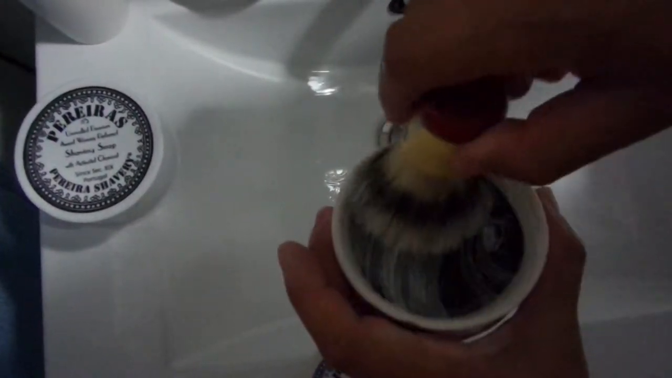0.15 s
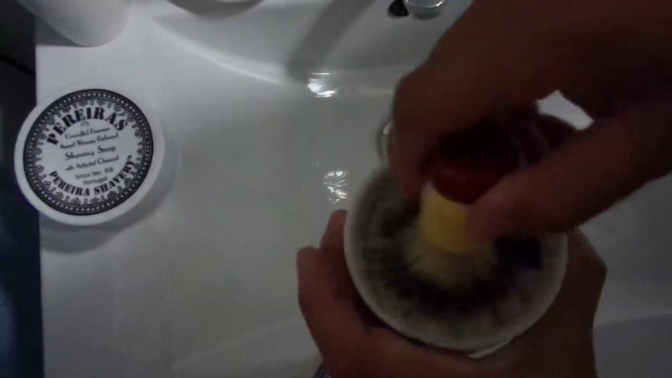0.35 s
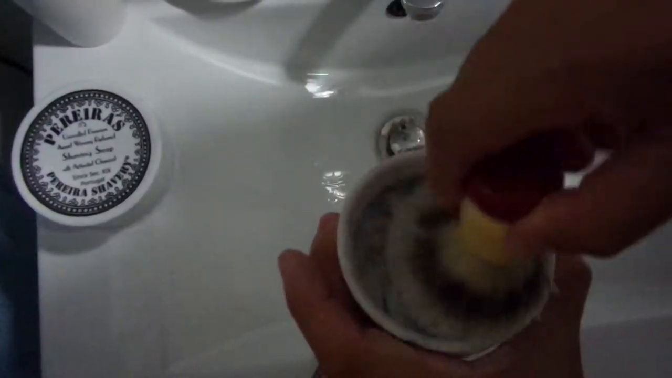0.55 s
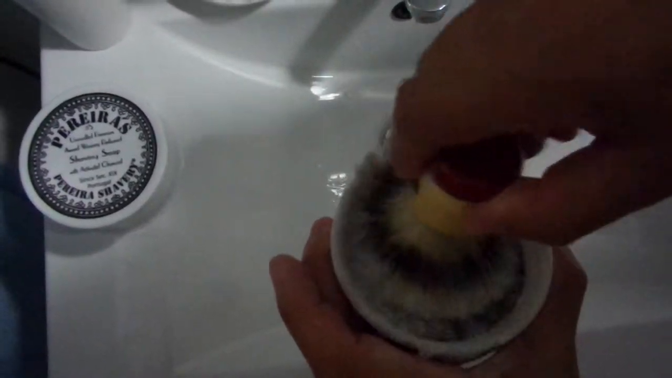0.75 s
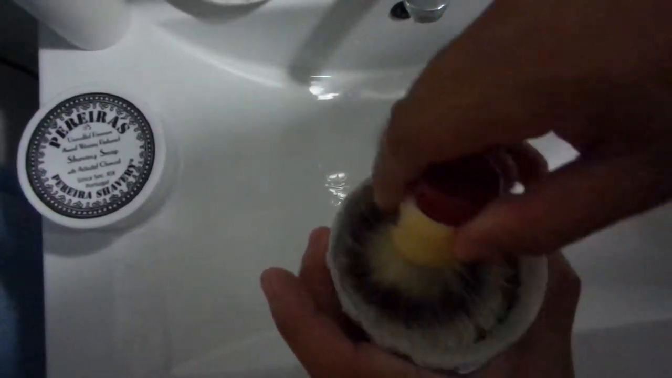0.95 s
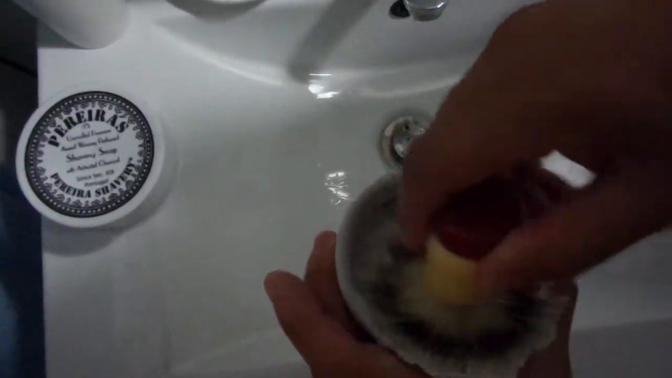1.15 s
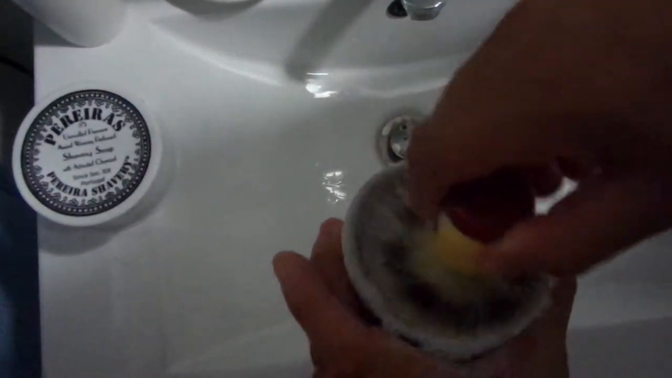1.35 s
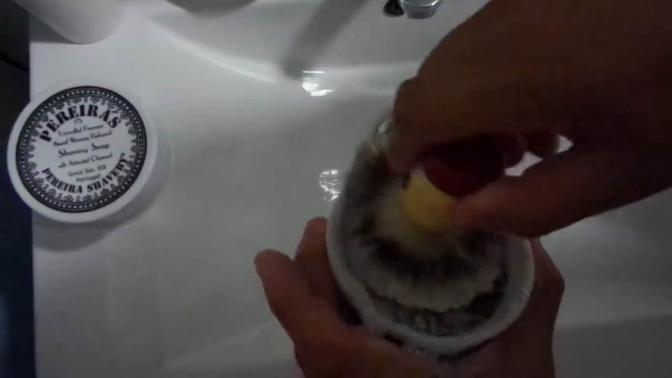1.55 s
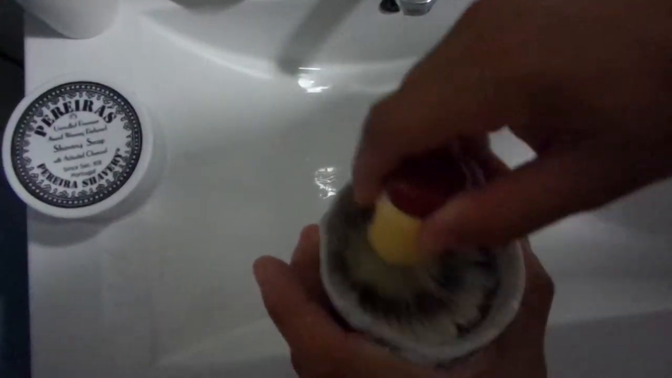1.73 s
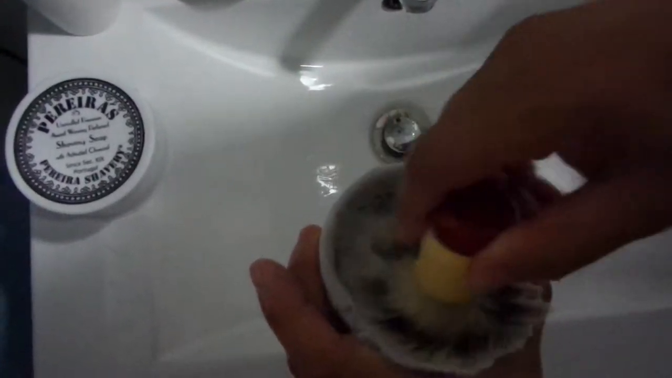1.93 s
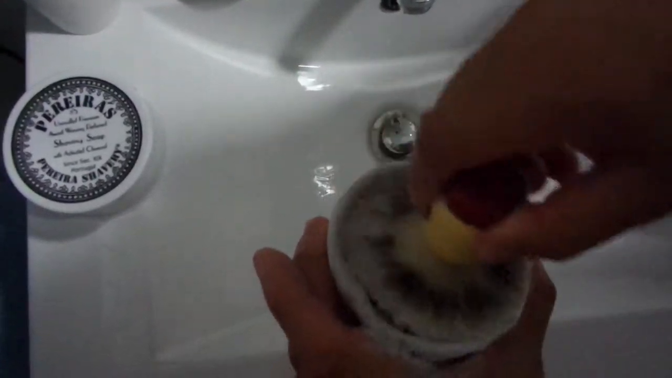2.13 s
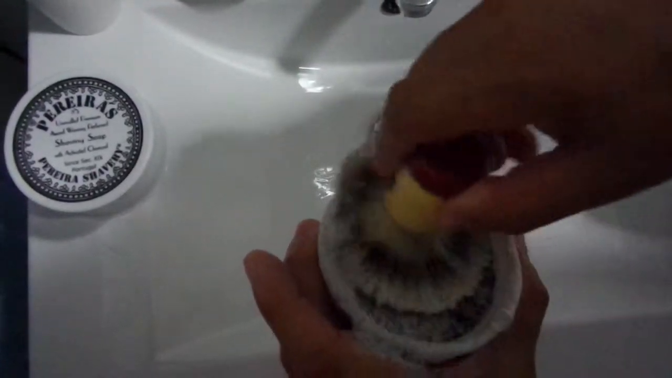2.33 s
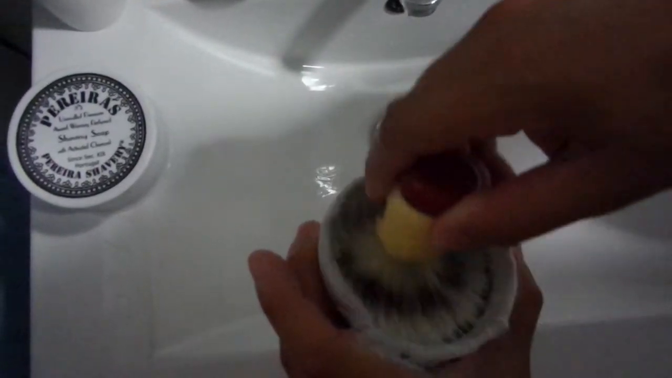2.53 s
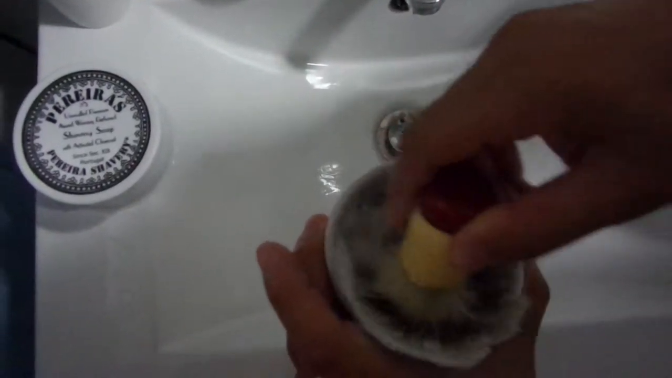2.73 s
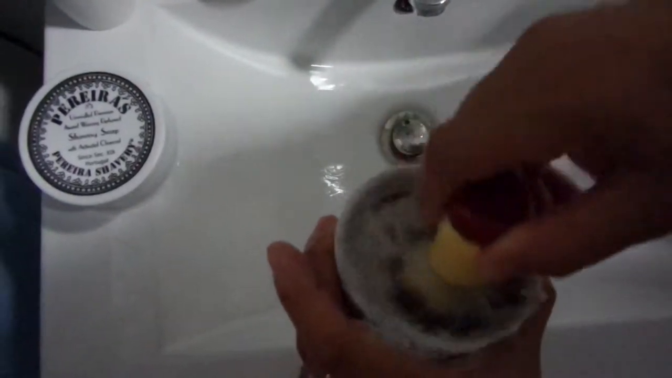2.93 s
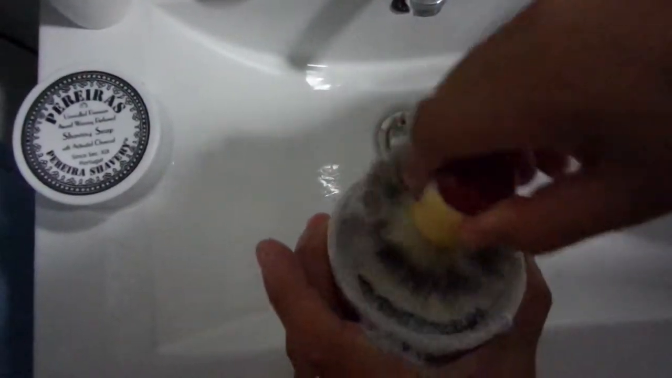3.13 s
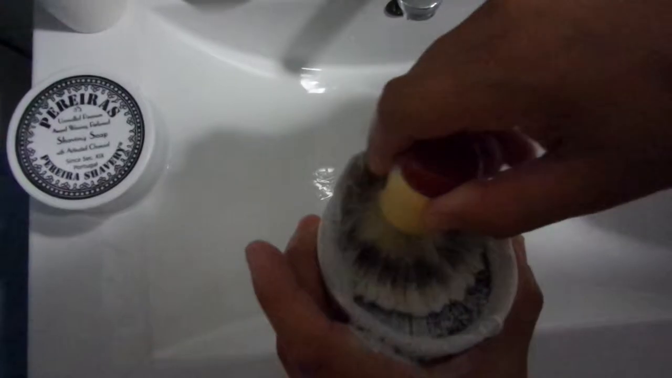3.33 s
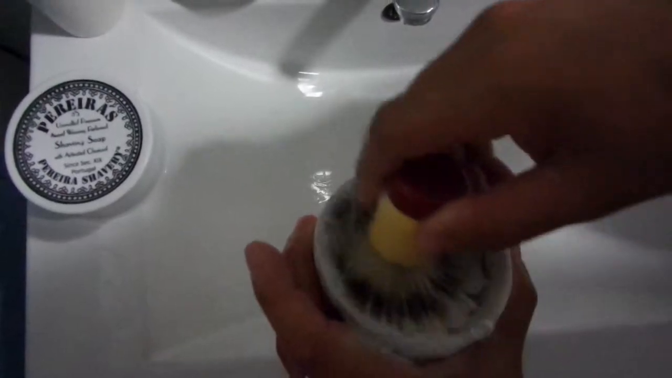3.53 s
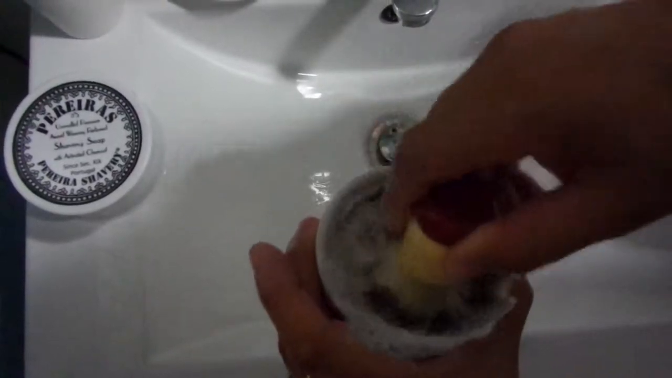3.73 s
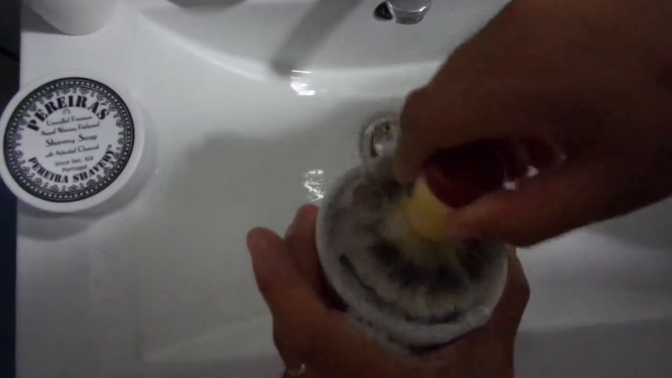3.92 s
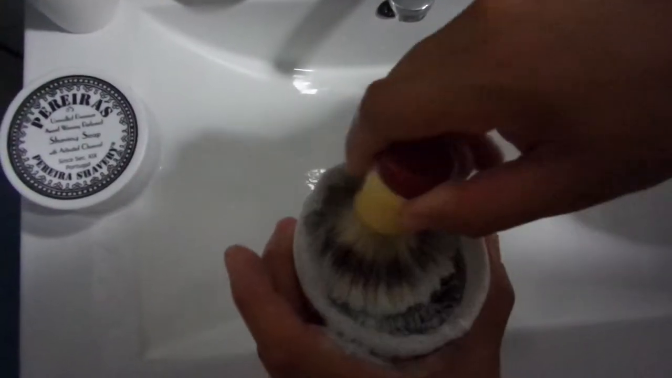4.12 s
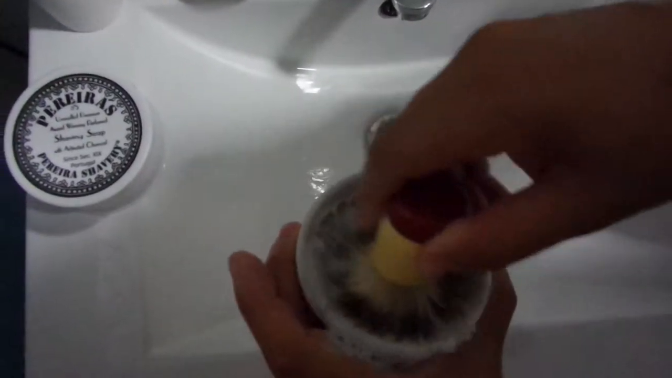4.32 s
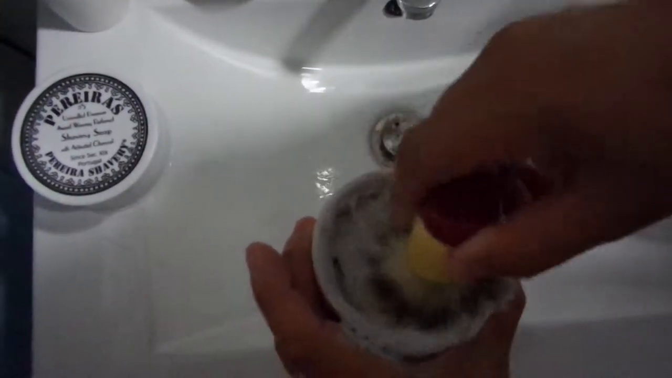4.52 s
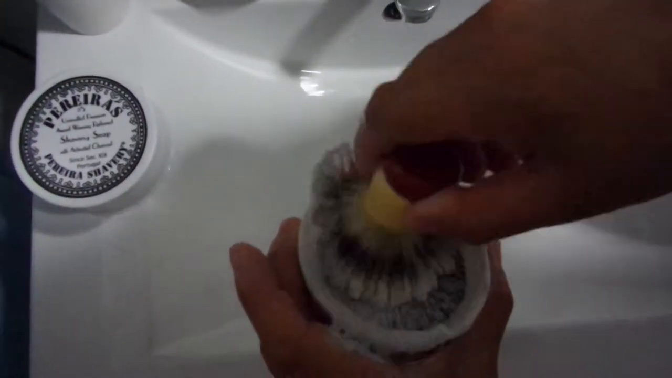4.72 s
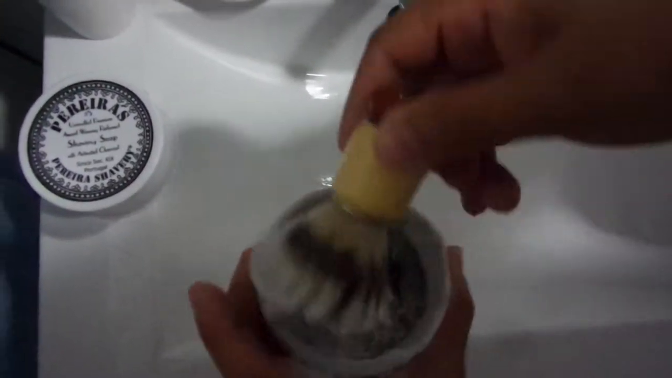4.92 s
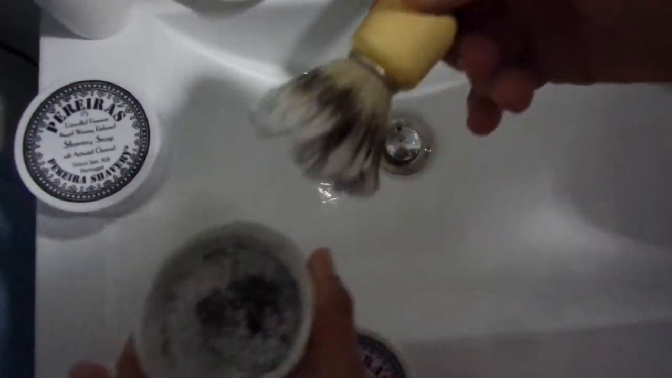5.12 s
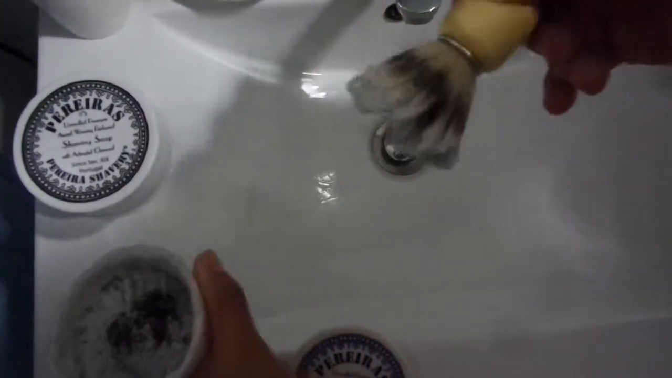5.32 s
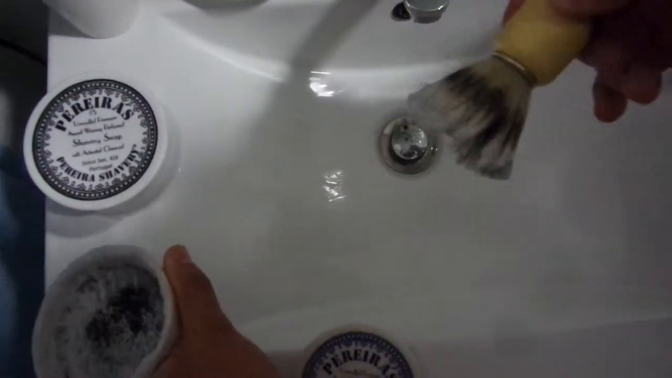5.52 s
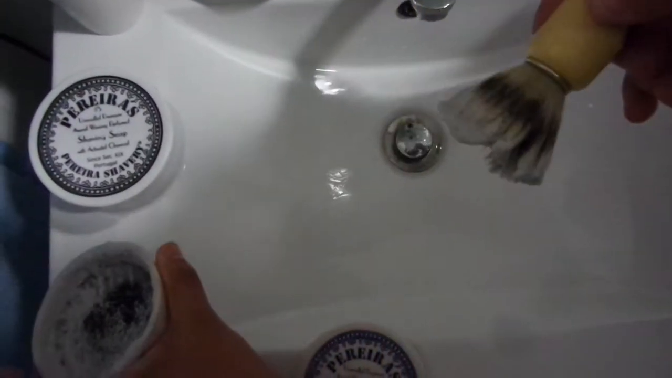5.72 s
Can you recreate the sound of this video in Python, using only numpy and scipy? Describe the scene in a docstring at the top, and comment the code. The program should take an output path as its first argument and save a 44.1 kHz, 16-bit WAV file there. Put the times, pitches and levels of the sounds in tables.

```python
"""Wet bristles swirl on a puck of soap in a hand-held tub over a bathroom sink, catching and flicking free.
Clumped clicks ring through tub resonances; finer, brighter clicks make the lather fizz, and both follow the strokes.
The brush lifts off, fingers slide on the tub, and at last a hard knock on the basin rattles as decaying modes.
The right microphone hears it clearly and the left muffled, over hiss, rumble, a wavering hum and a thin whine."""
import sys
import numpy as np
from scipy import signal
from scipy.fft import rfft, irfft
from scipy.io import wavfile
from scipy.ndimage import uniform_filter1d

SR = 44100
rng = np.random.default_rng(int(sys.argv[2]) if len(sys.argv) > 2 else 0)


def to_wav(sig):
    """Store sig (one row per channel, or 1-D mono) as 16-bit WAV at the path in sys.argv[1].

    Samples outside -1..1 are clipped; the rate is SR.
    """
    pcm = np.clip(np.atleast_2d(sig), -1, 1) * 32767
    pcm = np.round(pcm).astype(np.int16)
    wavfile.write(sys.argv[1], SR, pcm.T)  # frames by channels


N = 258426
T = np.arange(N) / SR

# Levels in the tables are relative; the functions trim and mix them.
# room and microphones at rest, left and right: f/Hz, level/dB
FLOOR_LEFT = [(25, -20), (55, -17), (90, -3), (140, 4), (250, -2.5), (450, -9), (750, -25), (1200, -21.5),
              (2000, -17), (3200, -25), (8000, -28.5), (12000, -25), (15000, -19), (15600, -12)]
FLOOR_RIGHT = [(25, -25), (55, -44), (90, -4), (135, 5.5), (220, -6.5), (400, -10.5), (650, -15),
               (2200, -13.5), (3200, -20), (5400, -21), (6800, -11), (9200, -9.5), (10500, -22.5),
               (14500, -21.5), (15600, -14)]
# a low hum that comes and goes: middle t/s, length t/s, level/dB
HUM_SWELLS = [(.75, 0.24, -66), (1.15, 0.23, -65), (1.9, 0.26, -67), (2.33, 0.47, -64.5), (2.82, 0.67, -60),
              (3.15, 0.33, -63), (4.8, 0.27, -71), (5.22, 0.33, -65)]
# lasting thin whine: f/Hz, level/dB
WHINE_TONES = [(6165, -71.5), (7675, -78.5), (7698, -72), (15350, -69)]
# faint tones that come and go together: f/Hz, level/dB
WHIRR_TONES = [(5879, -82), (7052, -77), (8227, -71)]
# when those tones sound: from t/s, to t/s
WHIRR_SPANS = [(2.21, 3.3), (4.31, 5.2), (5.0, 10)]
# decay of the room: f/Hz, t60/s
ROOM_T60 = [(100, 1), (1000, 0.15), (4000, 0.1), (12000, 0.26)]
# reflections from the basin: delay t/s, strength (gain)
BASIN_REFLECTIONS = [(.0013, -0.022), (.0029, 0.083), (.0041, -0.092), (.0058, 0.097), (.0083, -0.043)]
# the muffled left side: f/Hz, level/dB
LEFT_MIC = [(100, -9), (400, -22), (900, -23.5), (2000, -40.5), (5000, -22.5), (10000, -50), (16000, -5)]
# colour of the palm's rub: f/Hz, level/dB
GRIP_COLOUR = [(100, -33), (250, -1), (330, -8.5), (440, -1), (600, -18), (1200, -26), (4000, -70)]
# the palm shifting on the tub: middle t/s, length t/s, level/dB
RUBS = [(1.13, 0.24, -63.5), (2.1, 0.31, -58), (2.4, .25, -57), (3.3, 0.92, -65), (3.75, 0.27, -58),
        (4.07, 0.13, -62.5), (5.35, 0.36, -64)]
# colour of the sliding fingers: f/Hz, level/dB
SLIDE_COLOUR = [(600, -14), (1300, -6.5), (2300, -1.5), (3200, -5.5), (3800, 3), (4450, 2), (5000, -14),
                (9000, -7), (16000, -44)]
# fingers sliding as the tub is put aside: middle t/s, length t/s, level/dB
SLIDES = [(5.0, 0.71, -61.5), (5.23, 0.23, -55), (5.37, 0.18, -52)]
# modes of the tub when nudged: f/Hz, level/dB, t60/s
NUDGE_MODES = [(247, 3.5, 0.052), (538, -8, 0.12), (853, -8, 0.17), (1030, -9, 0.13), (1840, -2, .09),
               (2140, -2, 0.062)]
# ticks of handling and bursting foam: t/s, level/dB, centre f/Hz, width/octaves, t60/s, left minus right level/dB
TICKS = [(.157, -44, 1700, .7, 0.021, 15), (.656, -50, 1700, .7, 0.028, 17),
         (1.439, -46, 2680, 1, 0.033, 15), (1.799, -45, 1900, .8, 0.043, 12),
         (5.181, -41.5, 6500, 0.4, .02, -21), (5.3045, -24.5, 11500, 0.67, 0.023, -32),
         (5.305, -34, 3620, .08, 0.041, -34), (5.308, -30, 2300, 1, 0.017, -32),
         (5.326, -48, 2180, 0.57, 0.031, 12), (5.4255, -29.5, 1850, 1.0, 0.005, -28),
         (5.69, -47, 6240, 0.19, 0.013, -11), (5.7325, -39, 6400, 0.26, 0.0089, -15),
         (5.7565, -43, 6900, 0.27, 0.014, -15)]
# dull bumps of hands and tub: t/s, level/dB, centre f/Hz, width/octaves, t60/s, left minus right level/dB
BUMPS = [(.275, -45.5, 334, 0.54, 0.11, -22), (3.31, -46, 126, 0.4, .2, -10),
         (3.535, -43.5, 327, 0.25, 0.23, -18), (5.149, -36.5, 150, 0.92, 0.23, -23),
         (5.424, -44, 396, 0.38, 0.11, -21)]
# the knock and its rebounds: t/s, level/dB
KNOCKS = [(5.8183, -2.5), (5.8385, -10.5), (5.8492, -11), (5.856, -18)]
# ringing modes of the knock: f/Hz, level/dB, t60/s
KNOCK_MODES = [(127, -16.5, 0.65), (229, -20, 0.12), (290, -22, 0.17), (331, -20.5, 0.086),
               (785, -45, 0.066), (860, -29, 0.087), (1120, -28, 0.13), (1230, -7.5, 0.05),
               (1694, -20, 0.14), (1788, -23, 0.14), (2150, -13, 0.058), (2270, -34, 0.04),
               (3670, -23, .05), (4240, -29, 0.037)]
# colour of the knock's thud: f/Hz, level/dB
KNOCK_COLOUR = [(60, -19), (130, -2), (330, -5.5), (550, -13), (1150, 2.5), (1800, 0), (2300, -6),
                (2950, -14.5), (4200, -21.5), (5200, -31), (6000, -29), (9000, -36), (16000, -71)]
# colour of bristles on soap: f/Hz, level/dB
BRISTLE_COLOUR = [(200, -22.5), (400, -13), (680, -14.5), (850, -4.5), (1020, -13.5), (1220, -3),
                  (1900, -5.5), (2550, -4), (3200, -10), (4100, -9.5), (5200, -14.5), (6800, -10),
                  (10500, -23), (16000, -20.5)]
# colour of the lather's fizz: f/Hz, level/dB
LATHER_COLOUR = [(1500, -38), (3000, -6), (4100, 4.5), (5200, -7.5), (6800, 3.5), (9200, 0.5),
                 (10500, -13.5), (16000, -26.5)]
# resonances of tub and soap under the brush: f/Hz, bandwidth f/Hz, level/dB
TUB_RESONANCES = [(1215, 87, -3), (1587, 116, 1), (2264, 125, 8)]
# light contact between strokes: t/s, bristle level/dB, lather level/dB
CONTACT = [(0, -55, -43.5), (.07, -61, -55.5), (.24, -68.5, -55.5), (0.451, -63.5, -52),
           (.58, -66.5, -54.5), (.88, -63, -55), (1.3, -60, -51.5), (1.6, -63.5, -54), (2.0, -54, -49),
           (2.5, -63, -54), (2.8, -58.5, -51.5), (3.349, -54.5, -50.5), (3.901, -58.5, -55),
           (4.38, -65.5, -52.5), (4.48, -66, -56), (4.78, -65.5, -54)]
# pushes of the brush round the puck: middle t/s, length t/s, level/dB
STROKES = [(.125, 0.086, -53.5), (.39, 0.25, -59.5), (.49, 0.04, -58), (.7, 0.098, -54),
           (.78, 0.033, -56.5), (.98, 0.1, -54.5), (1.06, .07, -54.5), (1.14, 0.057, -51),
           (1.28, 0.12, -56), (1.38, 0.064, -48.5), (1.46, 0.098, -56), (1.54, 0.051, -52),
           (1.68, 0.36, -58.5), (1.9, 0.095, -51), (2.07, 0.064, -52), (2.18, 0.046, -54.5),
           (2.31, 0.12, -52), (2.42, 0.19, -52.5), (2.58, 0.073, -47.5), (2.74, 0.28, -52.5),
           (2.84, 0.083, -51), (2.96, 0.12, -52), (3.085, 0.078, -48.5), (3.19, 0.11, -55),
           (3.3, .12, -53.5), (3.42, .11, -52), (3.6, 0.15, -55), (3.69, 0.066, -49.5),
           (3.85, 0.071, -50.5), (3.97, 0.08, -50.5), (4.08, 0.14, -55), (4.15, 0.03, -53),
           (4.28, 0.16, -52.5), (4.4, 0.11, -51.5), (4.54, 0.091, -53), (4.63, 0.12, -54),
           (4.7, 0.036, -49), (4.86, 0.14, -48)]
# tufts of bristles snapping free: t/s, level/dB, ring f/Hz, treble level/dB
SNAPS = [(0.101, -28.5, 2480, -30), (0.133, -50, 2470, -8), (0.1729, -33, 2470, -7),
         (0.3274, -34, 2280, -1), (.374, -36.5, 2140, -13), (0.6775, -34, 7160, 0),
         (0.8958, -35.5, 7650, 7), (0.9736, -38.5, 1680, -22), (1.3112, -38, 2480, -11),
         (1.5033, -36, 2430, -33), (1.668, -37.5, 4170, -6), (1.7861, -32, 7350, -4),
         (1.7958, -33, 2260, 1.5), (2.062, -33.5, 2440, -9), (2.0927, -37, 2380, 2),
         (2.157, -39, 2520, -25), (2.2235, -35, 2370, -2), (2.3297, -30.5, 2300, -2),
         (2.4436, -38, 2530, -9), (2.585, -30, 8560, -4), (2.7291, -30.5, 1710, -36),
         (2.8444, -44, 2170, 6), (3.0775, -28.5, 2260, -12), (3.1555, -41, 1590, -14),
         (3.185, -35, 2340, -3), (3.338, -31.5, 2260, -6), (3.3846, -42, 2400, -20), (3.604, -42, 2330, 9),
         (3.857, -42, 2370, -23), (4.2804, -48, 2370, -5), (4.4162, -38, 2180, 0)]

LATHER_FOLLOWS = 0.37  # dB of fizz for each dB that a stroke adds
LIFT_S, LIFT_DB_PER_S = 4.9, 280  # the brush leaves the soap
EDGE_HZ = 15850  # upper band limit


def amp(db):
    """Decibels to gain."""
    return 10 ** (np.asarray(db) / 20)


def unit(x):
    """Scales to rms 1."""
    return x / np.sqrt(np.mean(x ** 2) + 1e-20)


def read(points, hz):
    """Reads a spectrum table on a log-frequency axis."""
    f, value = np.transpose(points)
    return np.interp(np.log(hz + 1), np.log(f + 1), value)


def add(mix, s, sound):
    """Mixes a sound in at time s, cut at the end of the mix."""
    part = mix[..., round(s * SR):][..., :sound.shape[-1]]
    part += sound[..., :part.shape[-1]]


def convolve(x, response):
    """Filters and keeps the length."""
    return signal.oaconvolve(x, response)[:len(x)]


def impulse(colour, size=2048):
    """The causal, minimum-phase click that has a given spectrum."""
    log_gain = np.log(amp(read(colour, abs(np.fft.fftfreq(size, 1 / SR)))))
    spectrum = np.exp(np.conj(signal.hilbert(log_gain)))
    return np.fft.ifft(spectrum).real[:size // 2]


def noise(colour):
    """Steady noise of rms 1 with a given spectrum."""
    gain = amp(read(colour, np.fft.rfftfreq(N, 1 / SR)))
    return unit(irfft(rfft(rng.standard_normal(N)) * gain, N))


def wander(hz):
    """A random drift of rms 1, with 2 * hz new points a second."""
    points = rng.standard_normal(N // 100)
    return unit(np.interp(T * hz * 2, np.arange(len(points)), points))


def swells(rows, rest_db):
    """Gain over time: a resting level plus a bell of power for each (middle s, length s, dB) row."""
    power = amp(rest_db) ** 2 + np.zeros(N)
    for s, length, db in rows:
        near = slice(max(round((s - length) * SR), 0), round((s + length) * SR))
        power[near] += amp(db) ** 2 * np.exp(-10 * ((T[near] - s) / length) ** 2)
    return np.sqrt(power)


def unsteady_tone(hz, drift_hz, rate_hz):
    """A sine of rms 1 whose pitch wanders by drift_hz rms."""
    return unit(np.sin(2 * np.pi * np.cumsum(hz + drift_hz * wander(rate_hz)) / SR))


def hum(hum_hz=57):
    """A low hum whose pitch and level waver as it swells, stronger on the right."""
    tone = unsteady_tone(hum_hz, drift_hz=2.4, rate_hz=6.3)
    mono = tone * swells(HUM_SWELLS, rest_db=-74) * amp(1.5 * wander(5))
    return mono * amp([[-5], [2]])


def hiss_and_rumble(left_db=-56.0, right_db=-58, split_hz=400, rumble_left_db=-63.5, rumble_right_db=-60.0,
                    waver_db=1.0, settle_db_per_s=0.42):
    """Microphone hiss as shaped noise, its low part split off as an uneven rumble that slowly settles."""
    floor = np.array([amp(left_db) * noise(FLOOR_LEFT), amp(right_db) * noise(FLOOR_RIGHT)])
    low = signal.sosfiltfilt(signal.butter(4, split_hz, fs=SR, output="sos"), floor)
    rumble_left = unit(low[0])
    rumble_right = unit(unit(low[1]) + 0.13 * rumble_left)  # the sides share a little rumble
    rumble = np.array([amp(rumble_left_db) * rumble_left, amp(rumble_right_db) * rumble_right])
    rumble = rumble * amp(waver_db * wander(4) - settle_db_per_s * (T - T.mean()))
    return floor - low + rumble


def whine_and_whirr():
    """A thin lasting whine and faint tones that switch on and off, all slightly unsteady sines."""
    def tones(rows):
        """Sums unsteady sines from rows of (Hz, dB)."""
        return sum(amp(db) * unsteady_tone(hz, drift_hz=9, rate_hz=30) for hz, db in rows)

    spans = sum(1. * (T > start) * (T < end) for start, end in WHIRR_SPANS)
    running = uniform_filter1d(spans, size=600)  # soft switching; overlapping spans add up
    return (tones(WHINE_TONES) + running * tones(WHIRR_TONES)) * amp([[-18], [0]])


def bathroom(x, room_db):
    """Quick reflections from the basin, then sparse echoes decaying by frequency like a small hard room."""
    t = np.arange(SR // 2) / SR
    late = rng.standard_normal(len(t)) * (rng.random(len(t)) < .1) * (t > .004)
    hz, at, bands = signal.stft(late, SR, nperseg=256)
    decay = amp(-60 * at / read(ROOM_T60, hz)[:, None])
    late = signal.istft(bands * decay, SR, nperseg=256)[1][:len(t)]
    response = amp(room_db) * late / np.linalg.norm(late)
    for s, strength in BASIN_REFLECTIONS:
        add(response, s, np.array([strength]))
    return x + convolve(x, response)


def grip(grip_db=-1, slide_db=-1):
    """The hand that holds the tub: friction noise, dull under the palm and hissing under sliding fingers."""
    palm = noise(GRIP_COLOUR) * swells(RUBS, rest_db=-71) * amp(grip_db)
    fingers = noise(SLIDE_COLOUR) * swells(SLIDES, rest_db=-100) * amp(slide_db)
    return palm + fingers


def ringing(modes, t):
    """Decaying sines from rows of (Hz, dB, t60 s)."""
    return sum(amp(db - 60 * t / t60) * np.sin(2 * np.pi * hz * t) for hz, db, t60 in modes)


def nudge(s=1.083, nudge_db=-45):
    """The handle touches the tub, whose modes ring softly."""
    out, t = np.zeros(N), np.arange(SR // 4) / SR
    add(out, s, amp(nudge_db) * ringing(NUDGE_MODES, t))
    return out


def taps(rows, gain_db, scatter):
    """A click and its short dying rattle, band-limited round one pitch, each on its own side."""
    out, t = np.zeros((2, N)), np.arange(SR // 4) / SR
    grid = np.geomspace(20, 20000, 90)
    for s, db, hz, width, t60, side_db in rows:
        bell = -.5 * (np.log2(grid / hz) / width) ** 2
        band_db = np.maximum(20 * np.log10(np.e) * bell, -60)
        drive = scatter * rng.standard_normal(len(t)) * amp(-60 * t / t60)
        drive[0] = 1  # the click itself
        burst = convolve(drive, impulse(np.c_[grid, band_db]))
        sides = amp(np.minimum([[side_db], [-side_db]], 0))  # only the far side is turned down
        add(out, s, sides * amp(db + gain_db) * burst / abs(burst).max())
    return out


def knock(knock_db=-9, crack_hz=2250, crack_s=0.001, crack_db=-1, ring_db=-1, scatter=0.08,
          scatter_s=0.031, echo_s=0.001256, echo=0.72):
    """A hard blow on the basin: thud, crack and ringing modes; its walls throw the thud back, rebounds rattle."""
    t, blows = np.arange(SR // 4) / SR, np.zeros(N)
    for s, db in KNOCKS:
        add(blows, s, amp([db]))
    walls = scatter * rng.standard_normal(len(t)) * np.exp(-t / scatter_s)
    walls[0] = 1  # direct blow
    add(walls, echo_s, np.array([echo]))
    click = impulse(KNOCK_COLOUR)
    thud = convolve(walls, click / abs(click).max())
    crack = np.sin(2 * np.pi * crack_hz * t) * (t / crack_s) ** 2 * np.exp(2 - 2 * t / crack_s)
    ring = ringing(KNOCK_MODES, t) * (1 - np.exp(-t * crack_hz))  # soft onset
    blow = thud + amp(crack_db) * crack + amp(ring_db) * ring
    blow = signal.sosfilt(signal.butter(3, 95, "high", fs=SR, output="sos"), blow)
    return amp(knock_db) * convolve(blows, blow)


def grains(per_s, spread_db, clump_db, clump_hz):
    """Randomly timed clicks of uneven size and sign, swelling in clumps."""
    gap, size, sign = rng.random((N // 20, 3)).T
    s = np.cumsum(-np.log(gap)) / per_s
    swell = rng.standard_normal(N // 100)
    clump = np.interp(s * clump_hz, np.arange(len(swell)), swell)
    height_db = spread_db * np.minimum(-np.log(size), 3) + clump_db * clump
    height = np.sign(sign - .5) * amp(height_db)
    inside = s < T[-1]
    return np.bincount((s[inside] * SR).astype(int), height[inside], N)


def flecks(colour, per_s, spread_db, clump_db, clump_hz, tint_db, tint_octaves, count=10):
    """Groups of clicks, each favouring its own pitch, catch and slip independently."""
    out, hz = np.zeros(N), np.geomspace(100, 16000, 60)
    for centre in np.geomspace(1100, 9000, count):
        tint = tint_db * np.exp(-.5 * (np.log2(hz / centre) / tint_octaves) ** 2)
        clicks = grains(per_s / count, spread_db, clump_db, clump_hz)
        out += convolve(clicks, impulse(np.c_[hz, read(colour, hz) + tint]))
    return out


def tub_resonance(x, drift=0.034, drift_hz=5):
    """Short resonances of tub and soap colour the clicks, and shift as the brush covers more or less of the tub."""
    out = x
    for hz, width, db in TUB_RESONANCES:
        # shift the band down to zero, smooth it, and shift it back
        turn = np.exp(2j * np.pi * np.cumsum(hz * (1 + drift * wander(drift_hz))) / SR)
        r = np.exp(-np.pi * width / SR)
        smoothed = signal.lfilter([1 - r], [1, -r], x / turn)
        out = out + amp(db) * 2 * (turn * smoothed).real
    return out


def steady(x):
    """Evens out the power over a few hundredths of a second: the hand sets the strength of a stroke."""
    power = uniform_filter1d(uniform_filter1d(unit(x) ** 2, size=1500), size=900)
    return x / np.sqrt(abs(power) + 1e-9)


def effort():
    """Gains of bristles and lather: strokes rise from light contact, fizz follows in part, the lift ends both."""
    s, bristle_db, lather_db = np.transpose(CONTACT)
    rest_db = np.interp(T, s, bristle_db)
    push = swells(STROKES, rest_db)
    fizz = amp(np.interp(T, s, lather_db)) * (push / amp(rest_db)) ** LATHER_FOLLOWS
    lift = amp(-LIFT_DB_PER_S * np.maximum(T - LIFT_S, 0))
    return push * lift, fizz * lift


def catching(hold_db=0.5, hold_s=0.027, rush_db=7.5, rush_s=0.0042):
    """A sticking tuft slightly hushes the stroke before it snaps free; a rush of bristles follows."""
    db, t = np.zeros(N), np.arange(SR // 16) / SR
    hold = -hold_db * np.exp(-t[::-1] / hold_s)
    rush = rush_db * np.exp(-t / rush_s)
    for s, *_ in SNAPS:
        add(db, s - t[-1], np.r_[hold, rush])
    return amp(db)


def snaps(snap_db=4.5, cycles=2.8, ring_share=0.42, straggle_s=0.012, straggle=0.28):
    """A tuft lets go with one crisp flick and a brief ring, and a few single bristles follow it."""
    out, t = np.zeros(N), np.arange(2048) / SR
    body, treble = impulse(BRISTLE_COLOUR), impulse(LATHER_COLOUR)
    for s, db, hz, treble_db in SNAPS:
        followers = (rng.random(len(t)) < .04) * (t > .001)
        drive = straggle * rng.standard_normal(len(t)) * followers * np.exp(-t / straggle_s)
        drive[0] = 1  # the tuft itself
        ring = np.sin(2 * np.pi * hz * t) * np.exp(-t * hz / cycles) * (1 - np.exp(-2 * t * hz))
        flick = ring_share * ring[:len(body)] + body / abs(body).max() / 2
        flick = flick + amp(treble_db) * treble / abs(treble).max()
        add(out, s + .0007, amp(db + snap_db) * convolve(drive, flick / abs(flick).max()))
    return out


def brush(lather_db=-.5, smooth=0.27, judder_db=2.0, burst_db=2.5, burst_hz=14):
    """Bristles flick over the soap through the tub; lather crackles more finely, in uneven bursts."""
    judder = amp(judder_db * wander(120))  # the whole knot sticks and slips
    flicks = flecks(BRISTLE_COLOUR, per_s=1200, spread_db=4.0, clump_db=2.5, clump_hz=69.45,
                    tint_db=8.5, tint_octaves=0.21)
    bubbles = flecks(LATHER_COLOUR, per_s=4000, spread_db=4.0, clump_db=5, clump_hz=59.8,
                     tint_db=7.5, tint_octaves=0.24)
    push, fizz = effort()
    rubbing = unit(flicks) + smooth * noise(BRISTLE_COLOUR)
    bristles = steady(tub_resonance(rubbing) * judder) * push
    lather = steady(bubbles * judder) * fizz * amp(lather_db + burst_db * wander(burst_hz))
    return (bristles + lather) * catching()


def scene():
    """Brush and knock reach the right microphone clearly and the left one muffled, over the background."""
    background = hiss_and_rumble() + hum() + whine_and_whirr()
    touches = taps(TICKS, gain_db=0.5, scatter=0.26) + taps(BUMPS, gain_db=-2.0, scatter=.09)
    handling = np.array([bathroom(side, room_db=-17) for side in touches])
    work = grip() + nudge() + snaps() + brush()
    blow = knock()
    # each side gets its own draw of the room's tail
    left, right = (bathroom(work, room_db=-10.5) + bathroom(blow, room_db=-5.5) for side in range(2))
    main = np.array([convolve(left, impulse(LEFT_MIC)), right])
    return background + handling + main


def record(dry):
    """The recorder's band limit: a steep low-pass filter."""
    low_pass = signal.firwin(511, EDGE_HZ, window=("kaiser", 9), fs=SR)
    return signal.oaconvolve(dry, low_pass[None], "same", axes=1)


dry = scene()
out = record(dry)
to_wav(out)
```